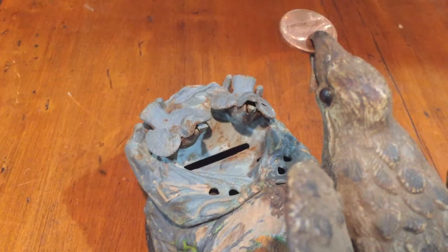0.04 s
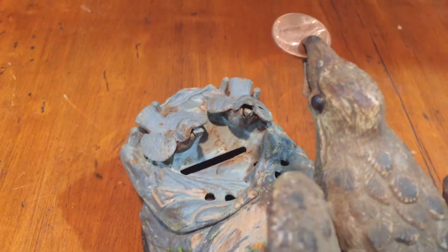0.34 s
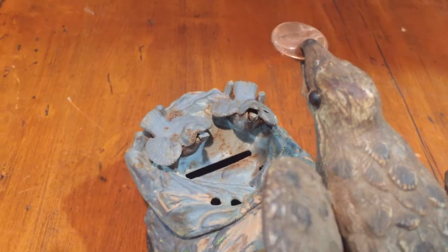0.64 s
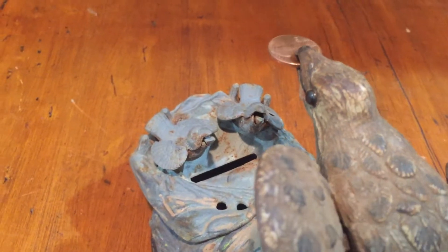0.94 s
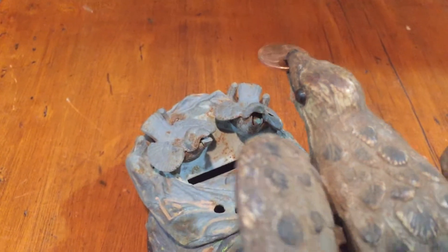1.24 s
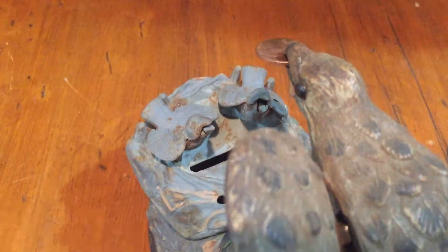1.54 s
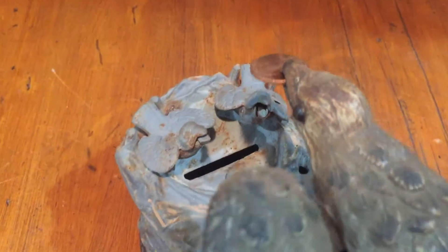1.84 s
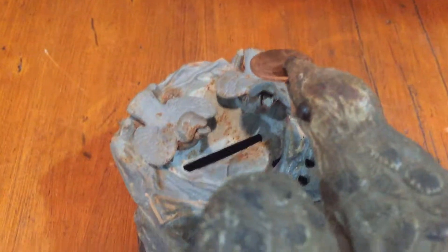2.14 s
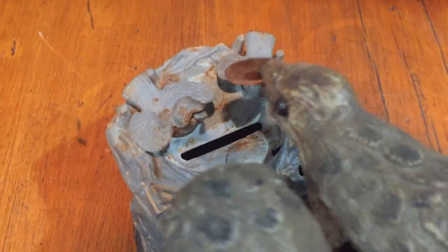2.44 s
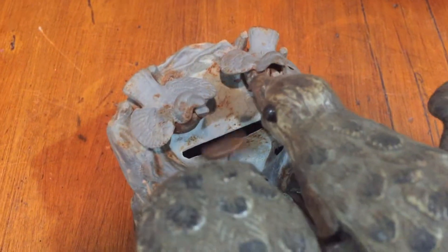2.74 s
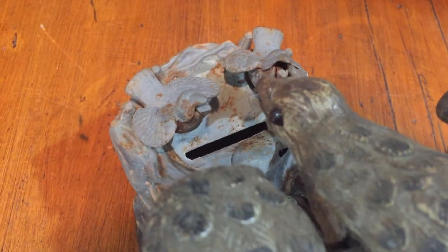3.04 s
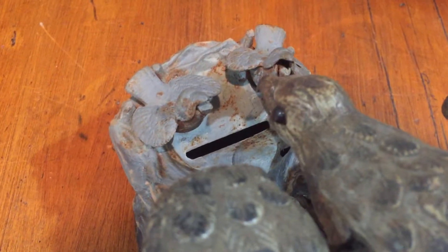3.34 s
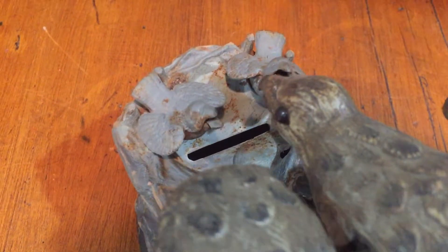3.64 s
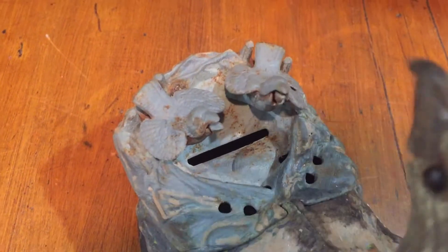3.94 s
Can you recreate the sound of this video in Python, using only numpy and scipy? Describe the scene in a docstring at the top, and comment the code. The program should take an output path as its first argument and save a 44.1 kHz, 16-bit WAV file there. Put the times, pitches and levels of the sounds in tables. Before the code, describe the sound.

Close up in a small room, a coin clinks sharply into an iron mechanical bank after a few soft lever clicks and table bumps. It rattles to rest in the hollow base before the iron parts clack back.

```python
"""A cast iron mechanical bank takes a coin, close up on a wooden table in a small room.
Loose parts clack, the lever ticks and scrapes; the coin clinks through the slot, drops into the hollow
base, bounces and wobbles to rest. The mechanism clacks back while the hand on it softly bumps the table.
Each blow on the iron is ringing modes plus a short noisy crash; scrape and wobble are swarms of tiny
blows. A low rumble and a faint hiss lie underneath."""
import sys
import numpy as np
from scipy import signal
from scipy.fft import rfft, irfft
from scipy.io import wavfile
from scipy.ndimage import map_coordinates

SR = 44100
rng = np.random.default_rng(int(sys.argv[2]) if len(sys.argv) > 2 else 0)


def pcm_store(signal):
    """Save signal as 16-bit PCM."""
    levels = np.round(np.clip(np.atleast_2d(signal), -1, 1) * 32767)
    wavfile.write(sys.argv[1], SR, levels.astype(np.int16).T)


N = 176400

# Tone of the rumble, the hiss and the rubbing hand. Each row: frequency in Hz, relative level in dB.
RUMBLE_EQ = [(20, -32.5), (32, -19), (48, -1.5), (75, 0.5), (100, -0.5), (130, -10), (185, -19), (230, -27),
             (330, -35), (700, -70.5)]
HISS_EQ = [(160, -35), (280, -12.5), (386, -7.5), (457, -11), (619, -14.5), (662, -12), (797, -11),
           (944, -8), (1300, -11), (1590, -15), (2050, -2.5), (2430, -12), (8320, -19.5), (15800, -25.5)]
RUB_EQ = [(40, -16), (110, -2.5), (190, -2), (290, -18.5), (600, -24), (1500, -34), (4000, -46),
          (12000, -58.5)]
# The fader ride on the hand's rub. Each row: time in seconds, level in dB.
RUB_LEVELS = [(0, -70.5), (2.38, -72.5), (2.461, -45.5), (2.62, -56.5), (2.718, -44), (2.85, -52),
              (3.1, -60.5), (3.55, -75), (3.66, -57), (3.78, -68), (3.899, -54), (4, -48)]
# Soft bumps through the table. Each row: start in seconds, level in dB, pitch in Hz.
TABLE_BUMPS = [(.654, -41, 85), (.648, -51.5, 198), (1.445, -45.5, 175), (2.45, -50, 107),
               (2.479, -45, 176), (2.50, -43, 150), (2.662, -38.5, 113), (2.697, -41.5, 178.5),
               (2.72, -33.5, 136), (2.734, -39, 101), (3.588, -49, 127), (3.644, -47, 151),
               (3.87, -41, 156), (3.908, -48, 175)]

# Blows on the iron. Each row: start in seconds, level in dB, bass in dB, treble in dB,
# pitch of the struck part in Hz (among the bounces, only flat landings have a pitch).
PART_CLACKS = [(.3555, -41, 2.5, 4, 1400), (.470, -59.5, 13, -6, 456), (.662, -53.5, 6, -25, 2250),
               (.759, -56.5, 9.5, -22, 1650), (.799, -59, 21, -8, 616), (1.451, -53, 28, -25, 600),
               (3.6408, -33.5, -4, -13.5, 2800), (3.792, -46, 1.5, -19, 1970), (3.835, -51, 16, -10, 1380),
               (3.872, -45.5, 11, 18, 1400), (3.885, -48, 1, -17, 2220), (3.911, -37.5, 1, -22, 2140),
               (3.914, -32.5, 2, -32, 1290), (3.938, -41, 10, -24, 2100), (3.9628, -38, 5, -10, 2240),
               (3.9885, -30, -2, 10, 2250)]
LEVER_TICKS = [(2.450, -54.5, -2, 4, 1410), (2.456, -53.5, 3, 16, 9000), (2.479, -43.5, -2, 8, 2800),
               (2.490, -48.5, -4, 18, 3830), (2.4998, -47.5, 4.5, 19.5, 1403), (2.655, -44, 7, 7, 2470),
               (2.675, -50.5, 1, 2.5, 7960), (2.688, -51.5, 0.5, 7.5, 2445), (2.694, -51, 4, 4, 8000),
               (2.703, -47.5, 2, -9, 1403), (2.7116, -37, -6, 5, 4410), (2.742, -47.5, 1.5, 14, 5920)]
SLOT_CLINKS = [(2.7913, -18, 7, -1, 8050), (2.8050, -18, 9, 2.5, 2380), (2.828, -38, 7.5, 11, 2500),
               (2.848, -43, -6, 3, 8000), (2.8724, -34.5, -2, -3, 8100), (2.8853, -34.5, 3, 1, 2350),
               (2.9295, -36.5, 11, -3, 2500), (2.9633, -39, 0, 14, 13000), (3.0218, -31.5, -6, 5, 11000),
               (3.0557, -37.5, -6, 13, 11000), (3.5908, -49, 28, 4, 9500)]
BASE_BOUNCES = [(2.9633, -16, 3, -10, 1650), (2.9662, -21.5, 2, -10, 1130), (3.0066, -26.5, 5, -8, 2400),
                (3.0665, -27.5, 2, 5), (3.0810, -27.5, 7, 8), (3.0926, -29.5, 5, 8.5), (3.1178, -32, 0, 1),
                (3.1452, -31.5, 6, 8), (3.2085, -36.5, 2, 5), (3.3165, -39, 2, 6), (3.3625, -39.5, 2, 4),
                (3.409, -42, 2, 4), (3.4825, -38.5, 2, 5)]
# The lever's slides. Each row: peak time in seconds, width in seconds, level in dB.
LEVER_SCRAPES = [(2.487, .018, -58), (2.69, .026, -57)]
# Rim blows that set the coin ringing. Each row: start in seconds, level in dB.
COIN_RINGS = [(2.792, -46), (2.805, -39.5), (2.965, -50), (3.024, -53), (3.32, -71), (3.365, -71),
              (3.45, -72)]
# Turns of the wobbling coin. Each row: peak time in seconds, level in dB.
WOBBLE_TURNS = [(3.155, -29), (3.186, -43), (3.212, -34.5), (3.265, -40), (3.322, -39), (3.366, -39),
                (3.414, -41.5), (3.447, -39), (3.484, -41), (3.511, -41.5), (3.539, -44), (3.564, -42)]

# Modes of the moving figure, the coin in the slot and the hollow base.
# Each row: frequency in Hz, relative level in dB.
FIGURE_MODES = [(430, -10), (590, -9), (755, -8), (1180, -4), (1410, -2), (1780, -3), (1930, 1), (2220, 0),
                (2390, 0), (2930, 1), (3400, -14), (3750, -10), (4350, -16)]
SLOT_MODES = [(1395, -4), (1670, -10), (2200, -1), (2370, -1), (2490, 1), (3900, -6), (4570, -12),
              (7880, -5), (8080, -3), (8280, -10), (9730, -14)]
BASE_MODES = [(544, -10), (760, -8), (930, -3), (1030, -4), (1156, 3), (1240, -1), (1340, -3), (1648, 2),
              (1905, -3), (2030, -3), (2200, -2), (2380, -4), (2480, -2), (2700, -5), (2800, -5),
              (2950, -1), (3380, -9), (3890, -18), (4720, -15), (5400, -14)]
# Each casting's crash of dense, short-lived modes. Each row: frequency in Hz, relative level in dB.
FIGURE_CRASH_EQ = [(100, -13.5), (400, 1.5), (900, -4.5), (1400, 3), (2500, -2.5), (3400, -10), (5000, -14),
                   (9000, -18.5), (15500, -36)]
SLOT_CRASH_EQ = [(100, -35), (400, -15), (1100, -7.5), (2300, 5), (3200, -5.5), (4200, -0.5), (6000, -10.5),
                 (8000, -1), (10500, -10.5), (15500, -17.5)]
BASE_CRASH_EQ = [(100, -30), (300, -30), (390, -8), (800, -3.5), (1150, 1), (1400, 0), (2700, 0),
                 (3300, -3), (4700, -10), (5700, -8), (8500, -17.5), (11000, -31), (15500, -45)]
# The struck bodies. Each lists: modes, their T60 at 1 kHz in seconds, crash EQ,
# crash level against the modes in dB, crash hold in seconds, crash T60 in seconds.
FIGURE_BODY = (FIGURE_MODES, .05, FIGURE_CRASH_EQ, -1, .004, .035)
LEVER_BODY = (FIGURE_MODES, .04, FIGURE_CRASH_EQ, 5, .0015, .014)
SLOT_BODY = (SLOT_MODES, .06, SLOT_CRASH_EQ, 4, .003, .02)
BASE_BODY = (BASE_MODES, .05, BASE_CRASH_EQ, 2, .0019, .022)
RIM_BODY = (BASE_MODES, .06, BASE_CRASH_EQ, 1, .001, .02)
# The small room's decay. Each row: frequency in Hz, T60 in seconds.
ROOM_DECAY = [(200, 0.55), (2000, 0.22), (12000, 0.14)]


def amp(db):
    """Decibels to gain."""
    return 10 ** (np.asarray(db) / 20)


def unit(x):
    """Scale to an RMS of 1."""
    return x / np.sqrt(np.mean(x ** 2) + 1e-20)


def decay(t, t60_s):
    """An envelope that falls 60 dB in t60_s."""
    return np.exp(-np.log(1000) * t / t60_s)


def swell(peak_s, width_s):
    """A bell-shaped envelope on the scene's timeline."""
    return np.exp(-.5 * ((np.arange(N) / SR - peak_s) / width_s) ** 2)


def along(curve, hz):
    """Read a curve on a log frequency axis."""
    knots_hz, values = np.transpose(curve)
    return np.interp(np.log(hz + 1), np.log(knots_hz + 1), values)


def add(track, start_s, sound):
    """Mix a sound into a track at its cue."""
    span = track[max(round(start_s * SR), 0):][:len(sound)]
    span += sound[:len(span)]


def equalise(x, db_of_hz):
    """Minimum-phase EQ: nothing rings ahead of the attack."""
    size = 2 * len(x)
    cepstrum = irfft(np.log(amp(db_of_hz(np.fft.rfftfreq(size, 1 / SR)))))
    cepstrum[1:size // 2] *= 2
    cepstrum[size // 2 + 1:] = 0
    return irfft(rfft(x, size) * np.exp(rfft(cepstrum)))[:len(x)]


def noise(eq):
    """Steady coloured noise at an RMS of 1."""
    gain = amp(along(eq, np.fft.rfftfreq(N, 1 / SR)))
    return unit(irfft(rfft(rng.standard_normal(N)) * gain, N))


def background(rumble_db=-55, swing_db=3.5, hiss_db=-74, knots=56):
    """Room tone: an uneven low rumble under a faint hiss."""
    drift = map_coordinates(rng.standard_normal(knots), [np.linspace(0, knots - 1, N)])
    rumble = unit(noise(RUMBLE_EQ) * amp(swing_db * drift))
    return amp(rumble_db) * rumble + amp(hiss_db) * noise(HISS_EQ)


def hand_on_table(rise_s=.002, t60_s=.11):
    """Dull bumps and the rub of the hand, carried by the wooden top."""
    bumps, t = np.zeros(N), np.arange(SR // 4) / SR
    envelope = 2 * (1 - np.exp(-t / rise_s)) * decay(t, t60_s)
    for start_s, db, hz in TABLE_BUMPS:
        add(bumps, start_s, amp(db) * envelope * np.sin(2 * np.pi * hz * t))
    rub_db = np.interp(np.arange(N) / SR, *np.transpose(RUB_LEVELS))
    return bumps + amp(rub_db) * noise(RUB_EQ)


def in_room(x, tail_db=-15):
    """Give a sound its own short room tail, the highs dying first."""
    hz, t, spectrum = signal.stft(rng.standard_normal(SR // 3), SR, nperseg=256)
    fade = decay(t, along(ROOM_DECAY, hz)[:, None])
    tail = signal.istft(spectrum * fade, SR, nperseg=256)[1]
    response = amp(tail_db) * tail / np.linalg.norm(tail)
    response[0] += 1  # direct sound
    return signal.fftconvolve(x, response)


def strike(body, grain, bass_db, treble_db, part_hz=None):
    """One blow on iron: ringing modes plus a brief crash, with its own bass, treble and optional bell."""
    modes, ring_t60_s, crash_eq, crash_db, hold_s, crash_t60_s = body
    t = np.arange(len(grain)) / SR
    hz, db = np.transpose(modes)[:, :, None]
    mode_t60_s = ring_t60_s * (hz / 1000) ** -.35
    phase = 2 * np.pi * rng.random(hz.shape)
    gains = amp(db + .97 * rng.standard_normal(hz.shape))
    ring = (gains * decay(t, mode_t60_s) * np.sin(2 * np.pi * hz * t + phase)).sum(0)

    def crash_colour(f, lift_db=6, width_hz=50):
        """The crash is lifted around each mode."""
        gap_hz = np.abs(f - hz).min(0)
        return along(crash_eq, f) + lift_db / (1 + (gap_hz / width_hz) ** 2)

    def tone(f, bass_hz=940, treble_hz=4660, bell_db=7, bell_oct=.17):
        """Two shelves, and a bell boost at the pitch of the struck part."""
        bass = bass_db / (1 + (f / bass_hz) ** 4)
        treble = treble_db * (1 - 1 / (1 + (f / treble_hz) ** 4))
        bell = bell_db / (1 + (np.log2((f + 1) / part_hz) / bell_oct) ** 2) if part_hz else 0
        return bass + treble + bell

    fresh_share, attack_s = .46, .00031  # this share of the crash changes from blow to blow
    burst = np.sqrt(1 - fresh_share) * grain + np.sqrt(fresh_share) * rng.standard_normal(len(t))
    burst *= decay(np.maximum(t - hold_s, 0), crash_t60_s)
    crash = amp(crash_db) * unit(equalise(burst, crash_colour))
    attack = 1 - np.exp(-t / attack_s)
    hit = equalise((unit(ring) + crash) * attack, tone)
    return hit / np.linalg.norm(hit) * np.sqrt(.005 * SR)  # the energy of 5 ms at an RMS of 1


def blows(cues, body, grain):
    """Play a cue list of blows on one body, in the room."""
    track = np.zeros(N)
    for start_s, db, *tone in cues:
        add(track, start_s, amp(db) * in_room(strike(body, grain, *tone)))
    return track


def clacking_parts(grain):
    """Loose iron parts knock together."""
    return blows(PART_CLACKS, FIGURE_BODY, grain)


def ticking_lever(grain):
    """The lever sticks and slips as it tips the figure."""
    return blows(LEVER_TICKS, LEVER_BODY, grain)


def chatter(force, body, grain, taps_per_s, bass_db, treble_db, voices):
    """A dense run of tiny blows, as strong as the force that presses them."""
    track = np.zeros(N)
    for _ in range(voices):
        onsets = rng.random(N) < taps_per_s / voices / SR
        taps = onsets * rng.choice([-1, 1], N) * force
        hit = in_room(strike(body, grain, bass_db, treble_db))
        track += signal.oaconvolve(taps, hit)[:N]
    return track / np.sqrt(taps_per_s * .005)  # density leaves the loudness alone


def scraping_lever(grain):
    """Rough iron slides over iron between the lever's ticks."""
    force = sum(amp(db) * swell(peak_s, width_s) for peak_s, width_s, db in LEVER_SCRAPES)
    return chatter(force, LEVER_BODY, grain, taps_per_s=400, bass_db=0, treble_db=11, voices=3)


def clinking_coin(grain):
    """The coin knocks against the slot and the walls."""
    return blows(SLOT_CLINKS, SLOT_BODY, grain)


def ringing_coin(centre_hz=13460, spread_hz=45, t60_s=.2, partials=5):
    """The thin, very high note of the coin itself: close partials that beat unevenly."""
    track, t = np.zeros(N), np.arange(SR // 3) / SR
    for start_s, db in COIN_RINGS:
        hz = centre_hz + spread_hz * rng.standard_normal((partials, 1))
        cycles = hz * t + rng.random((partials, 1))
        note = unit(np.sin(2 * np.pi * cycles).sum(0)) / np.sqrt(2)
        add(track, start_s, amp(db) * note * decay(t, t60_s))
    return track


def bouncing_coin(grain):
    """The coin lands in the hollow base and bounces, ringing the iron."""
    return blows(BASE_BOUNCES, BASE_BODY, grain)


def wobbling_coin(grain, start_s=3.148, end_s=3.585, roll_db=-50.8):
    """The rim chatters over the rough iron floor, pressing harder once a turn."""
    t = np.arange(N) / SR
    roll = amp(roll_db) * (t > start_s) * (t < end_s)
    turns = sum(amp(db) * swell(peak_s, width_s=.005) for peak_s, db in WOBBLE_TURNS)
    return chatter(roll + turns, RIM_BODY, grain, taps_per_s=900, bass_db=1, treble_db=1, voices=6)


def scene():
    """Room tone, table, coin and mechanism, mixed to mono."""
    # each casting's grain: a random pattern of dense modes, shared by all blows on it
    figure, slot, base = rng.standard_normal((3, 6144))
    bed = background() + hand_on_table()
    coin = clinking_coin(slot) + bouncing_coin(base) + wobbling_coin(base) + ringing_coin()
    mechanism = ticking_lever(figure) + scraping_lever(figure) + clacking_parts(figure)
    return (bed + coin + mechanism)[None]


def record(dry):
    """A steep low-pass shaves off the very top."""
    cutoff_hz = 15900
    return signal.sosfilt(signal.ellip(10, .1, 80, cutoff_hz, fs=SR, output="sos"), dry)


dry = scene()
out = record(dry)
pcm_store(out)
```